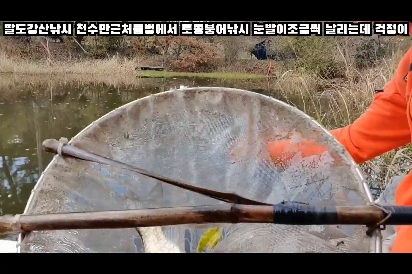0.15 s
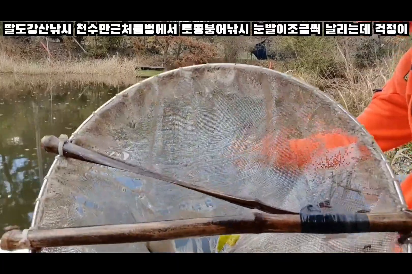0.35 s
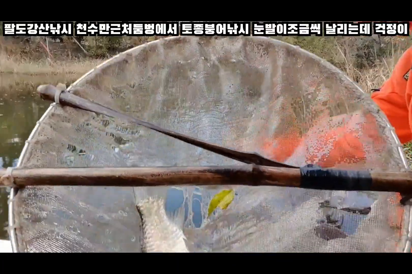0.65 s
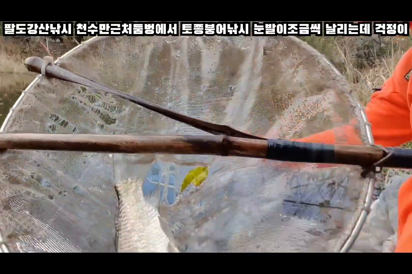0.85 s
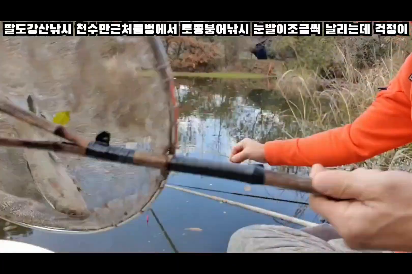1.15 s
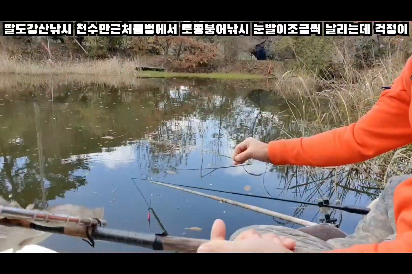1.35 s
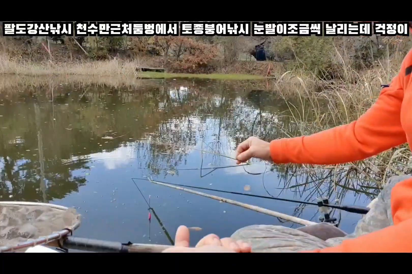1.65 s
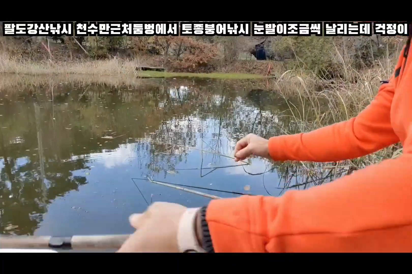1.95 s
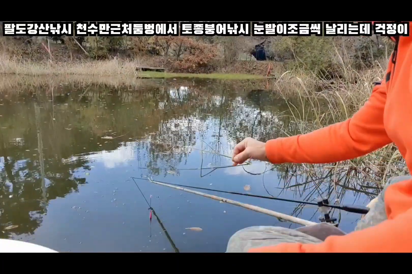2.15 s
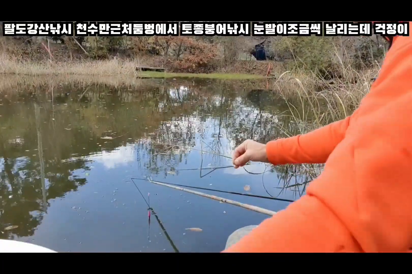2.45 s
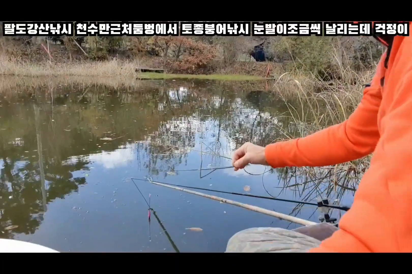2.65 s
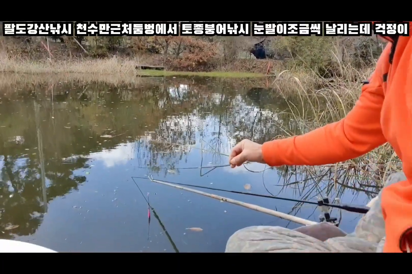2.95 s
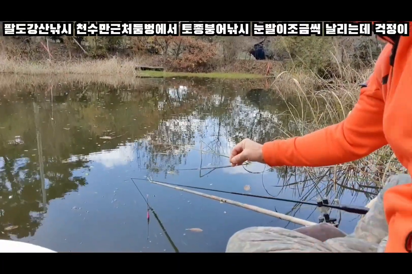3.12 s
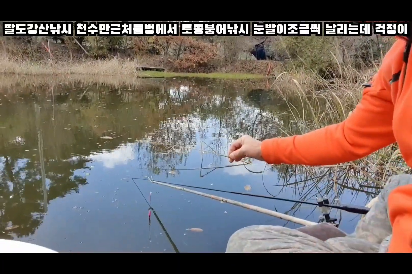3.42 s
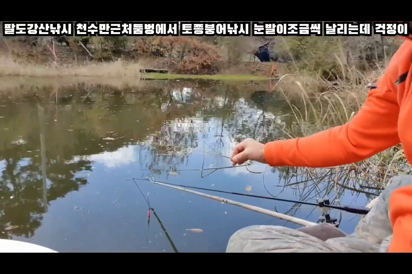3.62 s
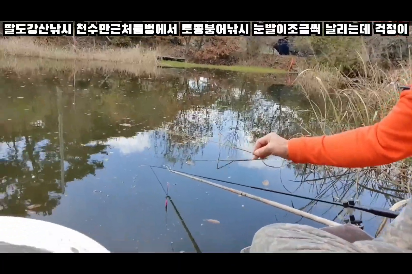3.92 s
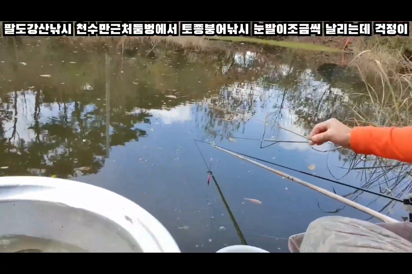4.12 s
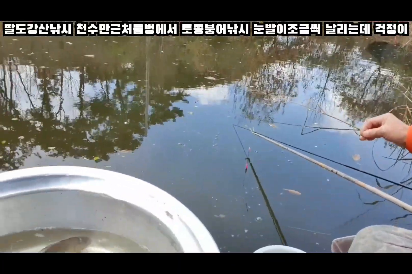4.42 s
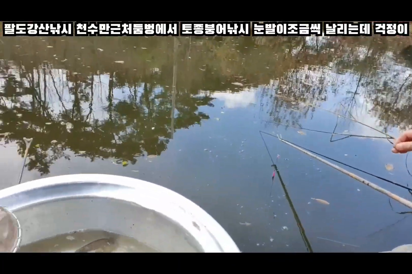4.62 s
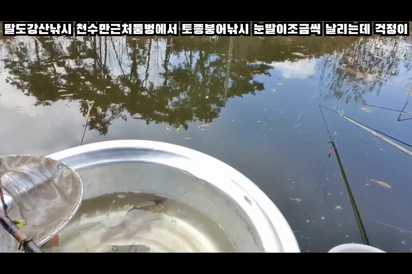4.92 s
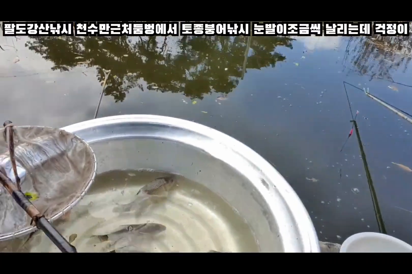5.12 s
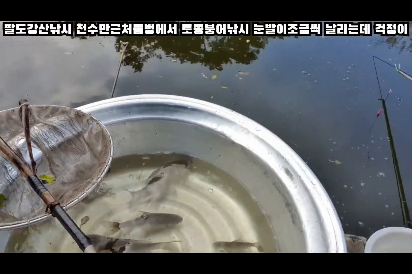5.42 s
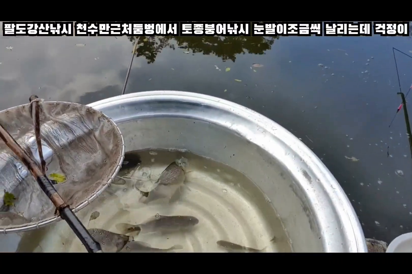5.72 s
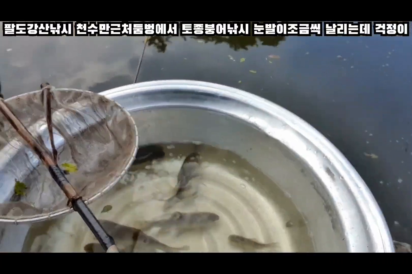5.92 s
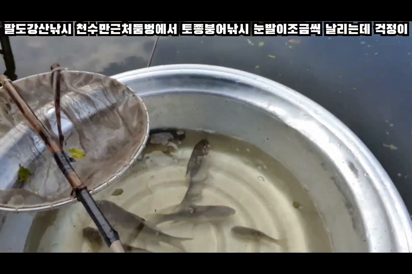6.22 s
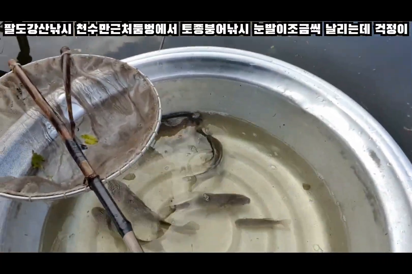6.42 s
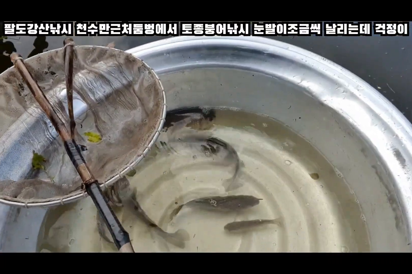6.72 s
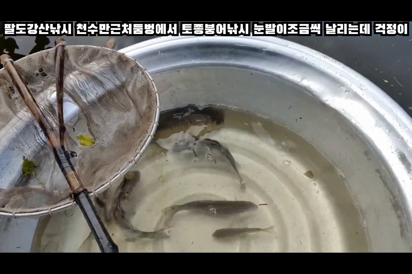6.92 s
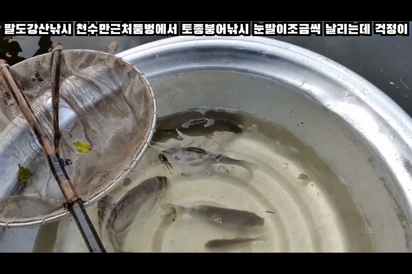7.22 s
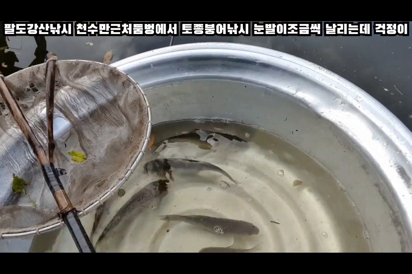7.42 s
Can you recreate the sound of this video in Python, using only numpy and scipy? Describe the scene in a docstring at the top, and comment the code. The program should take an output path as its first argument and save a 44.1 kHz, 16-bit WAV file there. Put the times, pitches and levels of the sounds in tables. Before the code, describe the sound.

Beside a pond, close stereo microphones hear a soft low rush and fine hiss. From 0 to 0.5 s, dull low handling bumps thud gently with a faint mesh rustle; tiny ticks and rubbing follow. At about 1.5 s a fish splashes into a metal basin: a sharp wet slap near 1.58, churning water, bright spray, plops and blips, renewed by tail strokes until 2.15, then fading with small drips. Mesh rustles at 2.2-2.55. At 2.54 the net hoop strikes the rim loudly, clanging, with quick follow-ups to 2.8; a weaker rattling burst runs 2.93-3.1, each ring choked short. The background dips, then slowly returns. Around 3.55-4.1 soft taps sit far left, the clearest knock at 3.8. Hiss swells near 5.9; a faint bird whistles upward at 6.0-6.5, breaking into raspy notes. Tiny bumps at 6.8 and 7.03 and soft low booms from 7.0 close it.

```python
"""A fish splashes into a wide metal basin of water beside a pond: ringing grains, gliding bubbles, noise spray.
The landing net's hoop clatters on the rim in two bursts: damped basin modes, a noise clang, bright cracks.
Soft bumps, built of damped swings, include a light knock close to the left microphone; wet mesh rustles in
tiny ticks. A faint bird calls in gliding sines and rasping noise, over a soft outdoor rush and hiss of
coloured noise."""
import sys
import numpy as np
from scipy import signal
from scipy.fft import rfft, irfft, next_fast_len
from scipy.io import wavfile
from scipy.ndimage import uniform_filter1d, minimum_filter1d

SR = 44100
rng = np.random.default_rng(int(sys.argv[2]) if len(sys.argv) > 2 else 0)


def dump_mix(stems):
    """Bounce the given channels to the path in sys.argv[1] as a 16-bit WAV at rate SR."""
    frames = np.atleast_2d(stems).T  # one column per channel
    limited = np.clip(frames, -1, 1)  # hard clip at full scale
    pcm = np.round(limited * 32767).astype(np.int16)
    wavfile.write(sys.argv[1], SR, pcm)


N = 333604
TIME = np.arange(N) / SR
CUTOFF_HZ = 15700

# strokes of the fish's tail churning the water: (time [s], slosh level [dB], spray level [dB])
TAIL_STROKES = [(1.542, -20, -20.5), (1.618, -21.5, -26.5), (1.768, -25, -25), (1.86, -24, -25),
                (1.905, -50, -23.5), (1.99, -35.5, -25), (2.138, -36.5, -43)]
# spectrum of the churned water: (frequency [Hz], level [dB])
SLOSH_SPECTRUM = [(170, -15.5), (260, -6), (400, -4), (640, 3.5), (950, -4.5), (1400, -0.5), (2000, 1),
                  (3000, -10.5), (4500, -6.5)]
# spectrum of the fine spray: (frequency [Hz], level [dB])
SPRAY_SPECTRUM = [(1180, -11), (2000, 0), (2830, -7), (4230, -1.5), (6700, -8.5), (8190, 1.5), (11900, 2),
                  (14900, -1), (16000, -12)]
# short bright ticks, then slaps and flung drops:
# (time [s], relative level [dB], hold before fading [s], left minus right [dB])
TICKS_AND_SLAPS = [(0.288, -28, 0.0019, 2), (0.953, -25, 0.0019, -7), (1.154, -30, 0.0037, -8),
                   (1.514, -24, 0.007, -3), (1.535, -18.5, 0.044, -1), (1.567, -14.5, 0.008, 5),
                   (1.579, -8.5, 0.0034, 5), (1.627, -22, 0.011, -6), (1.68, -37, .003, 0),
                   (1.74, -21.5, 0.0016, 0), (1.804, -16, 0.0046, -2), (1.86, -19.5, 0.0055, 0),
                   (1.909, -22.5, 0.041, -7), (2.0593, -19, 0.0038, -12), (2.097, -22.5, .001, 0),
                   (2.153, -24, 0.012, 1)]
# bubbles, from low plops to high blips: (time [s], relative level [dB], starting pitch [Hz], t60 [s])
PLOPS_AND_BLIPS = [(1.5332, -17, 4190, 0.013), (1.549, -18.5, 700, 0.087), (1.5632, -14.5, 406, 0.087),
                   (1.569, -2.5, 1260, 0.0092), (1.578, -5, 720, 0.022), (1.636, 6.5, 620, 0.0097),
                   (1.812, -24, 265, 0.068), (1.864, -0.5, 4050, 0.0041), (1.879, -12, 606, 0.05),
                   (2.066, -28, 1880, 0.1), (2.098, -22, 1303, 0.045), (2.105, -18.5, 1178, 0.12),
                   (2.155, -16, 2750, 0.04), (2.29, -39, 1230, 0.1), (2.392, -39, 1410, 0.022),
                   (2.458, -33, 1290, 0.11)]
STROKE_ATTACK_S, SLOSH_T60_S, SPRAY_T60_S = 0.018, 0.57, 0.43


def splash():
    """Churned water is a cloud of ringing grains under fine spray, with bright noise bursts and bubbles."""
    times, slosh_db, spray_db = np.transpose(TAIL_STROKES)
    churn = grains(SLOSH_SPECTRUM, per_cycle=0.13, spread_db=-0.5, cycles=34.0, clump_db=0.5)
    slosh = surges(times, slosh_db, STROKE_ATTACK_S, SLOSH_T60_S) * churn
    droplets = grains(SPRAY_SPECTRUM, per_cycle=.05, spread_db=4.2, cycles=9.0, clump_db=2.0)
    spray = surges(times, spray_db, STROKE_ATTACK_S, SPRAY_T60_S) * droplets

    burst_level, bubbles, t = np.zeros((2, N)), np.zeros((2, N)), TIME[:SR // 4]
    for s, db, hold, side_db in TICKS_AND_SLAPS:
        fade = decay(np.maximum(t - hold, 0), t60=.025)
        add(burst_level, s, from_db(db) * pan(side_db) * fade)
    for s, db, hz, t60 in PLOPS_AND_BLIPS:
        add(bubbles, s, from_db(db) * pulse(t, hz, t60, glide=0.2))   # a rising bubble rises in pitch
    bubbles[1] = np.roll(bubbles[0], round(0.0002 * SR))   # the basin lies to the left: that side leads
    bursts = from_db(-4.0) * burst_level * noise(SPRAY_SPECTRUM)
    return (slosh + bubbles) * pan(-2.3) + spray + bursts


# shoves of the basin's bottom by water or hoop: (time [s], relative level [dB])
BOTTOM_HEAVES = [(1.45, -37.5), (1.645, -20), (1.78, -24), (2.03, -31), (2.535, -32), (2.65, -36),
                 (2.72, -20), (2.93, -44), (7.011, -28), (7.15, -25.5), (7.24, -22.5), (7.31, -26),
                 (7.48, -33.5)]
# spectrum of the boom: (frequency [Hz], level [dB])
HEAVE_SPECTRUM = [(28, -41), (45, -11.5), (62, 6.5), (80, -8), (105, -4), (140, -21.5), (260, -16),
                  (350, -47)]
HEAVE_ATTACK_S, HEAVE_T60_S = 0.014, 0.73


def heave():
    """The water-laden bottom of the basin booms softly when shoved."""
    times, dbs = np.transpose(BOTTOM_HEAVES)
    level = from_db(-6.5) * surges(times, dbs, HEAVE_ATTACK_S, HEAVE_T60_S)
    return level * noise(HEAVE_SPECTRUM)


# hoop on the rim, also played by the clang and the cracks:
# (time [s], relative ring level [dB], relative crack level [dB], pitch of the modes most favoured [Hz])
HOOP_KNOCKS = [(2.5385, 4, -1.5, 810), (2.6224, -3, -5, 1550), (2.65, -15.5, -22, 1160),
               (2.661, -6.5, -14, 1350), (2.728, -11.5, -12, 1620), (2.799, -19, -29, 1410),
               (2.813, -21, -26, 1330), (2.934, -9, -15.5, 2200), (2.972, -14.5, -24, 1500),
               (2.997, -11, -23.5, 2000), (3.002, -22.5, -21.5, 1800), (3.042, -16, -21.5, 1700),
               (3.074, -26.5, -30, 1490), (3.106, -31, -30.5, 1500)]
# strong modes of the basin: (frequency [Hz], relative level [dB], t60 before choking [s])
BASIN_MODES = [(73, -23, .5), (103, -22, .5), (226, -15, .4), (315, -11, .42), (425, -5, .4),
               (516, -14, .3), (650, -8, .32), (730, -11, .28), (787, -11, .3), (844, -10, .4),
               (898, -5, .34), (968, -15, .3), (1057, -7, .32), (1092, -9, .28), (1217, -7, .38),
               (1259, -7, .28), (1306, -8, .28), (1421, -7, .26), (1487, -8, .27), (1555, -9, .24),
               (1660, -11, .24), (1701, -10, .23), (1824, -14, .22), (1910, -11, .24), (2062, -14, .22),
               (2745, -16, .18)]
# level balance of the ringing metal at the microphones: (frequency [Hz], left minus right [dB])
METAL_BALANCE = [(60, 2), (110, -2), (200, -2), (380, -3), (700, 0.5), (1290, -4.5), (2380, -4.5),
                 (4400, -3.5), (8120, -1), (15000, 14.5)]


def basin_modes():
    """Each knock lands on a new spot of the rim and so shares its force out differently among the modes."""
    out, t = np.zeros((2, N)), TIME[:SR]
    hz, mode_db, t60 = np.transpose(BASIN_MODES)
    rings = np.array([np.exp(2j * np.pi * f * t) * decay(t, life) for f, life in zip(hz, t60)])
    apart = np.arccos(np.clip(at_hz(CLOSE_LIKENESS, hz), -1, 1))   # the left side leads in phase
    ears = np.exp(.5j * apart * [[1], [-1]]) * from_db(at_hz(METAL_BALANCE, hz) * [[.5], [-.5]])
    for s, ring_db, _, centre_hz in HOOP_KNOCKS:
        scatter_db = 2.8 * rng.standard_normal(len(hz))
        share = from_db(ring_db + mode_db + favour(hz, centre_hz) - 6.0 + scatter_db)
        phases = np.exp(2j * np.pi * rng.random(len(hz)))
        ringing = ((ears * share * phases) @ rings).real
        add(out, s, ringing * choke(s, t))
    return out


# spectrum of the crowded weaker modes: (frequency [Hz], level [dB])
CLANG_SPECTRUM = [(170, -10), (350, 2.5), (600, 10.5), (980, 5.5), (1300, 11.5), (1900, 0.5), (2800, -3),
                  (4500, -16), (7300, -34.5), (11500, -24), (16000, -43)]
# how long they ring before choking: (frequency [Hz], t60 [s])
CLANG_DECAY = [(400, 0.45), (1400, 0.26), (3500, 0.17), (10000, 0.13)]


def basin_clang(count=14):
    """Crowded weak modes blur into a clang that dies fastest in the treble; harder cracks lift the treble."""
    out, metal = np.zeros((2, N)), noise(CLANG_SPECTRUM)
    edges, t = np.geomspace(140, 17000, count + 1), TIME[:SR]
    chokes = [choke(row[0], t) for row in HOOP_KNOCKS]
    for low, high in zip(edges, edges[1:]):
        hz, energy = np.sqrt(low * high), np.zeros((1, N))
        treble = np.clip(np.log(hz / 1500) / np.log(5), 0, 1)
        life = decay(t, at_hz(CLANG_DECAY, hz))
        for (s, ring_db, crack_db, centre_hz), damped in zip(HOOP_KNOCKS, chokes):
            body_db = ring_db + favour(hz, centre_hz) + 5.0
            db = (1 - treble) * body_db + treble * (crack_db + 24.0)
            add(energy, s, (from_db(db) * damped * life) ** 2)
        band_filter = signal.butter(2, [low, high], "band", fs=SR, output="sos")
        band = signal.sosfilt(band_filter, metal)
        out += band * np.sqrt(energy) * pan(at_hz(METAL_BALANCE, hz))
    return out


# spectrum of metal on metal, also of the bumps' ticks: (frequency [Hz], level [dB])
CRACK_SPECTRUM = [(530, -43), (900, -8), (1920, -4.5), (3640, -16.5), (4150, -16), (7580, -28), (9650, -19),
                  (13400, -19.5), (16000, -44.5)]


def cracks():
    """The bright instant of metal meeting metal is a short burst of noise."""
    out, t = np.zeros((2, N)), TIME[:SR // 10]
    for s, _, crack_db, _ in HOOP_KNOCKS:
        burst = decay(t, t60=.028) * noise(CRACK_SPECTRUM, size=len(t))
        add(out, s, from_db(crack_db + 12.0) * burst)
    return out * pan(0.76)


CHOKE_DB = 7.5   # what a later knock of 0 dB ring level takes from the ring of the earlier ones


def choke(s, t):
    """Gain on the ring of the knock at time s: each later contact of the hoop damps it, a hard one most."""
    loss = 0
    for later, db, _, _ in HOOP_KNOCKS:
        if later > s + .02:
            loss = loss + from_db(db / 2) * np.clip((s + t - later) * 250, 0, 1)   # sets in over 4 ms
    return from_db(-CHOKE_DB * loss)


def favour(hz, centre_hz):
    """In dB: a knock feeds modes near its own pitch best; the contact is too slow for much higher ones."""
    octaves = np.log2(hz / centre_hz)
    return 2.5 - 5.0 * np.clip(octaves, 0, 1.5) - 3.0 * np.clip(-octaves, 0, 1.5)


# dull handling bumps: (time [s], swing level [dB], starting pitch [Hz], t60 [s], left minus right [dB])
HANDLING_BUMPS = [(0.01, -25.5, 220, 0.047, -4.5), (0.292, -24.5, 218, 0.072, -6),
                  (0.330, -24, 192, 0.14, -5), (0.360, -20, 244, 0.056, -4), (0.378, -18, 190, 0.029, -3),
                  (0.401, -21.5, 187, .1, -4.5), (0.451, -23, 206, 0.05, -5),
                  (0.477, -25.5, 296, 0.051, -6), (3.561, -38, 270, 0.049, 17),
                  (3.579, -43, 554, 0.083, 17), (3.602, -31.5, 315, 0.021, 22),
                  (3.7945, -12.5, 311, .05, 20), (3.844, -28.5, 430, 0.02, 19),
                  (3.885, -34.5, 346, 0.041, 24), (3.957, -37, 382, 0.024, 30), (3.994, -34, 522, 0.04, 25),
                  (4.049, -35, 553, .025, 15), (4.095, -41.5, 360, 0.05, 21),
                  (6.802, -30.5, 640, 0.028, -2), (7.034, -29.5, 615, 0.021, 11)]
# spectrum of their scuff: (frequency [Hz], level [dB])
SCUFF_SPECTRUM = [(55, 8), (250, -1.5), (480, 6), (700, -2), (1000, -45), (2000, -21), (5000, -32),
                  (11000, -24), (16000, -43)]
OVERTONE_RATIO, OVERTONE_DB = 2.06, -12.5   # second mode of a bump, level relative to the first


def bumps():
    """Soft blows near the microphone: a tiny tick, a low damped swing with one overtone and a dull scuff."""
    out, t = np.zeros((2, N)), TIME[:SR // 4]
    for s, db, hz, t60, side_db in HANDLING_BUMPS:
        overtone = from_db(OVERTONE_DB) * pulse(t, OVERTONE_RATIO * hz, t60 / 2, glide=0)
        swing = pulse(t, hz, t60, glide=-0.2) + overtone
        scuff = from_db(-17.0) * decay(t, t60=.12) * noise(SCUFF_SPECTRUM, size=len(t))
        tick = from_db(-13.0) * decay(t, t60=0.005) * noise(CRACK_SPECTRUM, size=len(t))
        tick_share = min(hz / 300, 1) ** 4   # the lowest bumps hardly tick
        add(out, s, from_db(db) * (pan(side_db) * (swing + scuff) + tick_share * tick))
    return out


# mesh and sleeve rubbing: (time [s], length [s], tick level [dB], scrape relative to ticks [dB])
MESH_RUBS = [(0.12, 0.23, -39, -0.5), (0.954, 0.34, -42, -20), (1.15, 0.28, -44, -21),
             (1.352, 0.24, -46.5, -18), (2.205, 0.24, -41.5, -8), (2.393, 0.094, -34.5, -18),
             (2.466, 0.13, -36.5, -18), (3.55, 0.086, -50, -11)]
# spectrum of the fine ticks: (frequency [Hz], level [dB])
TICK_SPECTRUM = [(700, -8), (1800, 0), (2600, -8), (4500, -1), (7000, -18), (9000, -1.5), (11800, 4.5),
                 (16000, -21)]
# spectrum of the coarse scrape: (frequency [Hz], level [dB])
SCRAPE_SPECTRUM = [(450, -2.5), (900, 4), (1900, -1), (2800, -6.5), (5000, -21)]


def rustle():
    """Mesh threads slip in tiny ticks, with a coarser scrape under pressure; each rub swells and fades."""
    ticking, scraping = np.zeros(N), np.zeros(N)
    for s, length, db, scrape_db in MESH_RUBS:
        rub = from_db(db) * hump(s, length, crest=0.43)
        ticking += rub
        scraping += from_db(scrape_db) * rub
    ticks = grains(TICK_SPECTRUM, per_cycle=.06, spread_db=1.0, cycles=2.7, clump_db=1.3)
    scrape = grains(SCRAPE_SPECTRUM, per_cycle=.15, spread_db=1.0, cycles=4.0, clump_db=1.5, count=10)
    return (ticking * ticks + scraping * scrape) * pan(-2.8)


# bird notes: (time [s], length [s], starting pitch [Hz], glide [Hz/s], level [dB], rasp share [0-1])
BIRD_NOTES = [(5.987, 0.28, 3790, 2896, -45, 0), (6.202, 0.057, 3650, 7000, -48.5, 0.2),
              (6.236, 0.036, 4090, 32000, -45, 0.2), (6.248, 0.061, 4700, 2000, -49, 0.7),
              (6.221, 0.17, 2240, 4000, -51.5, .7), (6.388, 0.036, 3950, -1500, -44.5, 0.14),
              (6.4, 0.083, 2100, 0, -50.5, 0.5)]
# spectrum of the rasp: (frequency [Hz], level [dB])
RASP_SPECTRUM = [(1600, -14), (2400, -2.5), (3100, -8), (4100, 5), (5000, -5), (6500, -15)]
NOTE_CREST = 0.42   # share of a note's length at which it is loudest


def bird():
    """A thin rising whistle breaks into short rasping notes with a fainter low voice under them."""
    out, hoarse = np.zeros((2, N)), noise(RASP_SPECTRUM)
    waver = .022 * rms_one(uniform_filter1d(rng.standard_normal((2, N)), size=60))
    for s, length, start_hz, glide, db, rasp in BIRD_NOTES:
        hz = start_hz + glide * np.clip(TIME - s, 0, length)
        rasp = np.clip(rasp, 0, 1)
        cycles = np.cumsum(hz * (1 + waver), axis=1) / SR
        whistle = np.sqrt(2) * np.sin(2 * np.pi * cycles)
        voice = np.sqrt(1 - rasp) * whistle + np.sqrt(rasp) * hoarse
        out += from_db(db) * hump(s, length, NOTE_CREST) * voice
    return out * pan(-5.0)


# spectrum of the distant low rush: (frequency [Hz], level [dB])
RUSH_SPECTRUM = [(15, -33.5), (25, -13), (54, 0.5), (108, -5), (188, -8), (258, -2.5), (306, -5.5),
                 (449, -6), (510, -3.5), (658, -2), (1010, -7.5), (2250, -22), (4000, -25), (5200, -28.5),
                 (8800, -120)]
# spectrum of the fine high hiss: (frequency [Hz], level [dB])
HISS_SPECTRUM = [(1470, -42.5), (2500, -23), (3890, -10.5), (7080, -6.5), (11600, 2), (14900, -4),
                 (15600, -4), (16000, -29)]
# likeness of the distant background at the two microphones: (frequency [Hz], correlation [-1 to 1])
DISTANT_LIKENESS = [(60, 0.91), (130, 0.79), (290, 0.57), (640, 0.36), (1410, -0.31), (3100, 0.055),
                    (6820, -0.085), (15000, 0.082)]
RUSH_DB, HISS_DB = -43, -50.0   # outside the dip and the swell
# the dip after the clatter: start, time to sink, time constant of the return; depths
DIP_S, SINK_S, RETURN_S = 3.21, 0.15, 0.75
RUSH_DIP_DB, HISS_DIP_DB = 13.5, 8.5
# swell of the hiss: time of the crest, its height, time constant either side
CREST_S, CREST_DB, CREST_WIDTH_S = 5.86, 8.0, 0.79


def outdoors():
    """A distant low rush under a fine high hiss; both dip after the clatter, and later the hiss swells once."""
    since = TIME - DIP_S
    dip = np.clip(since / SINK_S, 0, 1) * np.exp(-np.maximum(since - SINK_S, 0) / RETURN_S)
    swell = np.exp(-np.abs(TIME - CREST_S) / CREST_WIDTH_S)
    rush_level = from_db(RUSH_DB - RUSH_DIP_DB * dip)
    hiss_level = from_db(HISS_DB - HISS_DIP_DB * dip + CREST_DB * swell)
    rush = rush_level * noise(RUSH_SPECTRUM, DISTANT_LIKENESS) * pan(-2.3)
    hiss = hiss_level * noise(HISS_SPECTRUM, DISTANT_LIKENESS) * pan(-3.5)
    return rush + hiss


# likeness of close sounds at the two microphones: (frequency [Hz], correlation [-1 to 1])
CLOSE_LIKENESS = [(60, 1), (130, 0.82), (290, 1), (640, 0.26), (1410, -0.46), (3100, 0.33), (6820, -0.18),
                  (15000, 0.49)]


def noise(colour, likeness=CLOSE_LIKENESS, size=N):
    """Stereo noise of a given colour, its two sides as alike at each frequency as likeness says; rms 1."""
    padded = next_fast_len(size)
    hz = np.arange(padded // 2 + 1) * SR / padded
    mid, side = rfft(rng.standard_normal((2, padded)))
    alike = np.clip(at_hz(likeness, hz), -1, 1)
    low_skirt = 1 / (1 + (colour[0][0] / (hz + 1)) ** 8)
    high_skirt = 1 / (1 + (hz / colour[-1][0]) ** 8)
    both = np.sqrt(1 + alike) * mid + np.sqrt(1 - alike) * side * [[1], [-1]]
    gain = from_db(at_hz(colour, hz)) * np.minimum(4 * low_skirt * high_skirt, 1)
    return rms_one(irfft(both * gain, padded)[:, :size])


def grains(colour, per_cycle, spread_db, cycles, clump_db, count=26):
    """Random tiny ringing events in clumps, high ones most frequent, each pitch with its own delay; rms 1."""
    out = np.zeros((2, N))
    clumps = from_db(clump_db * rms_one(uniform_filter1d(rng.standard_normal(N), size=350)))
    for hz in np.geomspace(colour[0][0], min(colour[-1][0], CUTOFF_HZ), count):
        born = int(per_cycle * hz * N / SR) + 1
        sizes = from_db(spread_db * np.minimum(rng.exponential(1, born), 4))
        sizes = sizes * rng.choice([-1, 1], born)
        clicks = clumps * np.bincount(rng.integers(0, N, born), sizes, N) + 1e-18
        r = decay(1 / SR, cycles / hz)   # a resonator rings for the given cycles to -60 dB
        resonator = [1, -2 * r * np.cos(2 * np.pi * hz / SR), r * r]
        rung = rms_one(signal.lfilter([1, 0, -1], resonator, clicks))
        lag = round(rng.uniform(-.00036, -.00014) * SR)   # the left side leads
        out += from_db(at_hz(colour, hz)) * np.sqrt(hz) * np.array([np.roll(rung, lag), rung])
    return rms_one(out)


ONSET_CYCLES = 0.84   # a swing takes this many cycles to build up


def pulse(t, hz, t60, glide):
    """A damped sine that builds up within a cycle and whose pitch glides by a share over its t60."""
    onset = np.minimum(t * hz / ONSET_CYCLES, 1)
    bent_time = t + glide * t * np.minimum(t / t60, 2) / 2
    return onset * np.sin(2 * np.pi * hz * bent_time) * decay(t, t60)


def surges(times, dbs, attack_s, t60):
    """At each time a quick rise and a slow dying away; where they overlap their energies add up."""
    energy, t = np.zeros((1, N)), TIME[:2 * SR]
    shape = np.minimum(t / attack_s, 1) * decay(np.maximum(t - attack_s, 0), t60)
    for s, db in zip(times, dbs):
        add(energy, s, (from_db(db) * shape) ** 2)
    return np.sqrt(energy)


def hump(s, length, crest):
    """A smooth rise and fall from time s, of height 1 at the share crest of its length."""
    corners = s + length * np.array([0, np.clip(crest, .05, .95), 1])
    return np.sin(np.interp(TIME, corners, [0, np.pi / 2, np.pi]))


def decay(t, t60):
    """An exponential fall of 60 dB in t60 seconds."""
    return from_db(-60 * t / max(t60, .001))


def from_db(db):
    """Decibels to amplitude."""
    return 10 ** (np.asarray(db) / 20)


def rms_one(x):
    """Scale to an rms of 1."""
    return x / np.sqrt(np.mean(x ** 2) + 1e-20)


def at_hz(points, hz):
    """Read a table of (frequency, value) along a logarithmic frequency axis."""
    known, value = np.transpose(points)
    return np.interp(np.log(np.maximum(hz, 1)), np.log(known), value)


def pan(db):
    """Left and right gains that differ by db, left the louder when positive."""
    return from_db(np.array([[db], [-db]]) / 2)


def add(out, s, sound):
    """Mix a sound in from time s."""
    start = max(round(s * SR), 0)
    out[:, start:start + sound.shape[-1]] += sound[..., :N - start]


def limiter(x, ceiling_db, release_db_per_s, ahead_s):
    """The gain ducks just ahead of a peak above the ceiling and then recovers at a steady rate in dB."""
    over = np.maximum(20 * np.log10(np.abs(x).max(axis=0) + 1e-9) - ceiling_db, 0)
    ahead = max(int(ahead_s * SR), 2)
    early = -minimum_filter1d(-over, 2 * ahead + 1)   # the largest excess nearby
    held = np.maximum.accumulate(early + release_db_per_s * TIME) - release_db_per_s * TIME
    return x * from_db(-uniform_filter1d(held, ahead // 2 + 1))


def scene():
    """The splash and clatter in the basin, the handling close by, the bird and the outdoors behind."""
    basin = splash() + heave() + basin_modes() + basin_clang() + cracks()
    return basin + bumps() + rustle() + bird() + outdoors()


def record(dry):
    """Loud peaks are limited and the top is cut."""
    limited = limiter(dry, ceiling_db=-.3, release_db_per_s=400.0, ahead_s=.003)
    top_cut = signal.ellip(10, .1, 90, CUTOFF_HZ, fs=SR, output="sos")
    return signal.sosfilt(top_cut, limited)


dry = scene()
out = record(dry)
dump_mix(out)
```